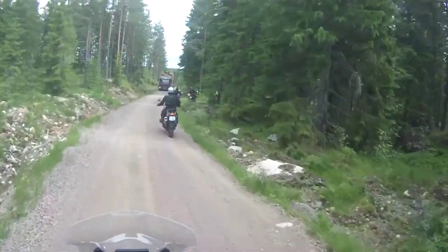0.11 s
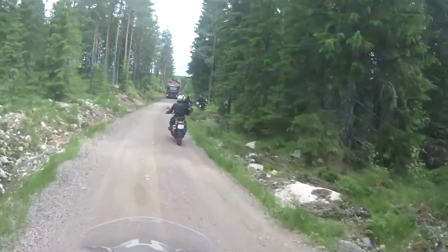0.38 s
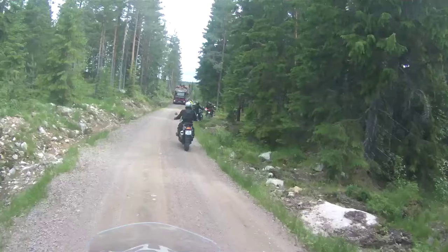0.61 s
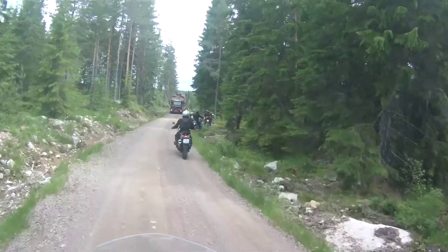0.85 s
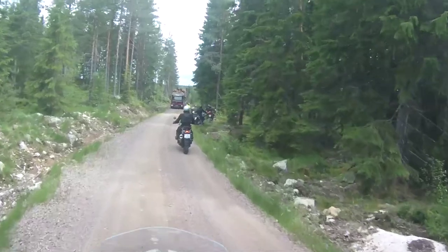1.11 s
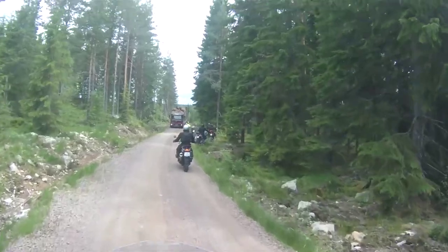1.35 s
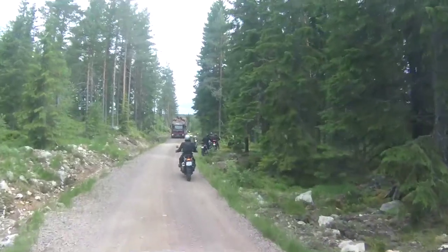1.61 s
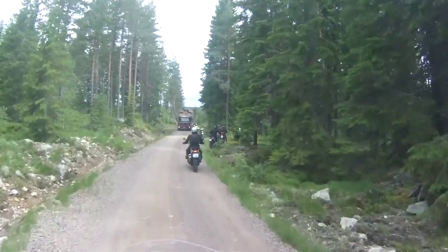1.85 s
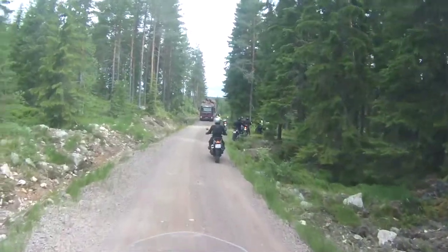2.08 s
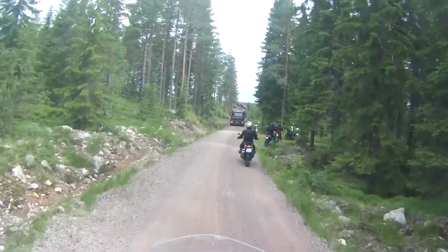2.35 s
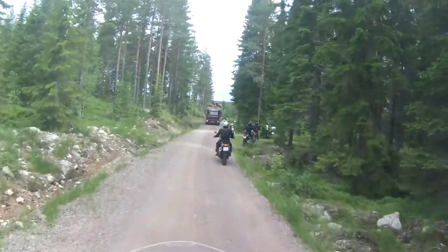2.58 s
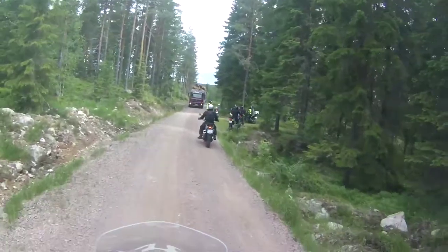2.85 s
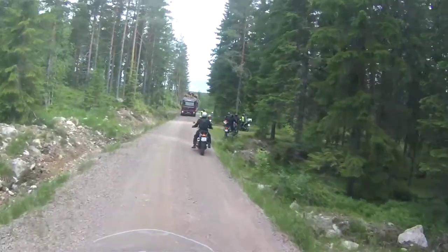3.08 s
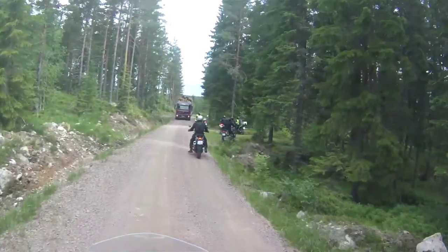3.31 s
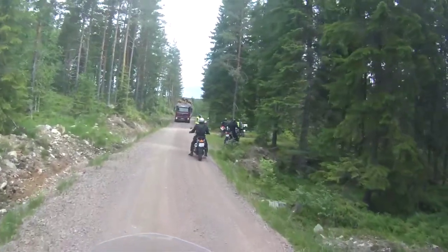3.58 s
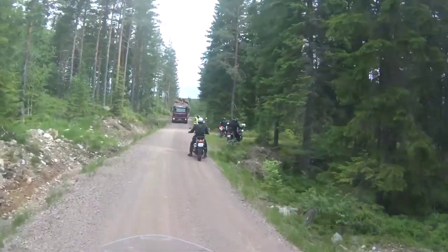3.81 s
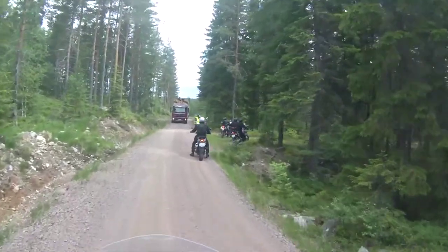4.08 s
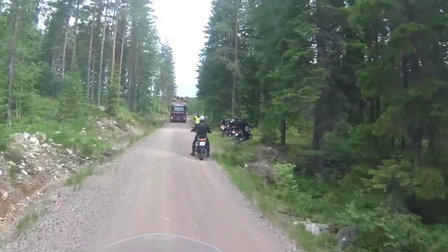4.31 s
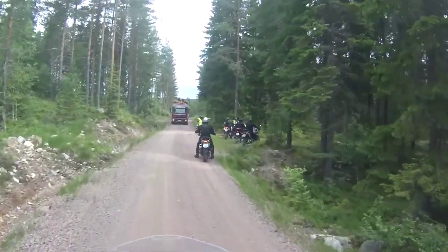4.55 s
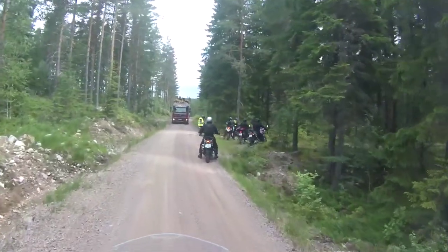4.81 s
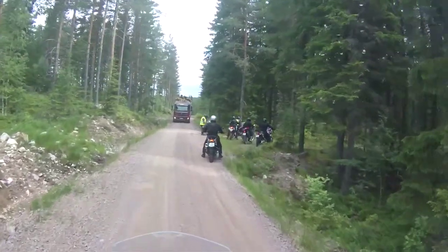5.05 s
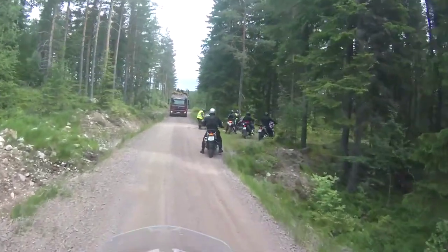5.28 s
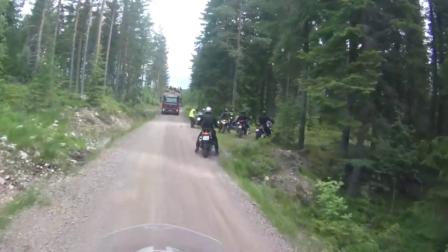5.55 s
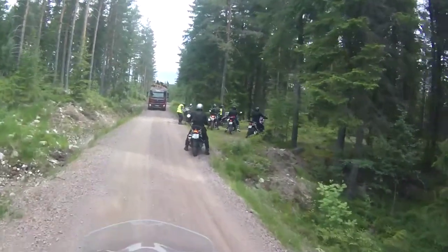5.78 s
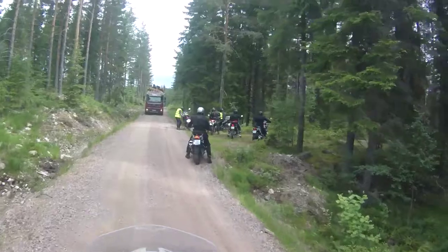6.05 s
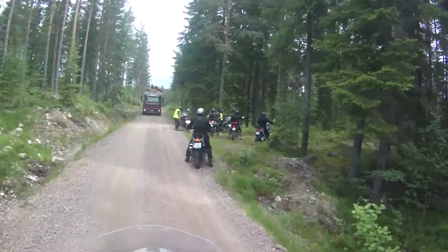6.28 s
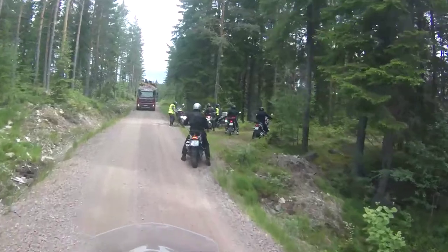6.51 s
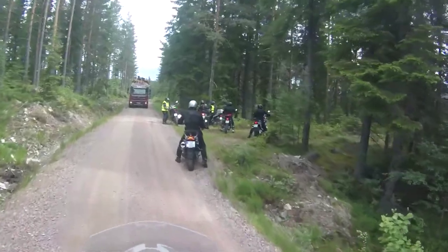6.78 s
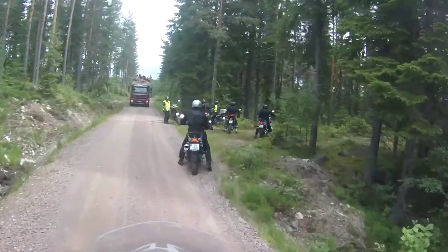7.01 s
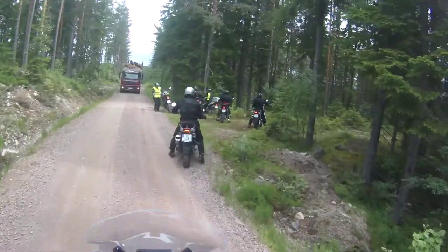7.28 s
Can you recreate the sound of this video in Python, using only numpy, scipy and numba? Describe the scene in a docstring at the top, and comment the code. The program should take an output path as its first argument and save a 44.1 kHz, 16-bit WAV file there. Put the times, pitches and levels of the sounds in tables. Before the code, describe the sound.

A motorcycle idles slowly over crunching gravel, muffled wind buffeting and dull knocks around it, then the engine revs into a rising hum at the end.

```python
"""A twin-cylinder motorcycle coasts at idle along a forest gravel road, heard by a helmet camera in a closed case.
From the start low-passed pulse trains thump in the exhaust, noise bursts excite casing modes and valve ticks,
and dense clicks crunch under the tyres; decaying partials knock the frame and band-passed noise buffets the port.
From about 2 s brakes squeak faintly as short, randomly modulated sines.
At the end the rider opens the throttle and the thuds fuse into rising harmonics of the firing rate."""
import sys
import numpy as np
from scipy import signal
from scipy.fft import rfft, irfft, next_fast_len
from scipy.io import wavfile
from scipy.ndimage import uniform_filter1d
from numba import njit

SR = 44100
rng = np.random.default_rng(int(sys.argv[2]) if len(sys.argv) > 2 else 0)


def natural_amplitude(level_db):
    """Convert a level in decibels to a linear amplitude factor, elementwise."""
    exponent = np.asarray(level_db, float) / 20
    return 10 ** exponent


def dump(signal):
    """Clip the signal to [-1, 1] and save it as 16-bit WAV at the path in sys.argv[1]."""
    limited = np.clip(np.atleast_2d(signal).T, -1, 1)
    pcm = np.round(limited * 32767).astype(np.int16)
    wavfile.write(sys.argv[1], SR, pcm)


N = 325899
T = np.arange(N) / SR

# firing rate of the revved engine: t/s, f/Hz
REV = [(6.42, 20.76), (6.548, 25.45), (6.694, 32.6), (6.802, 41.43), (6.922, 48.83), (7.006, 53.8),
       (7.12, 58.3), (7.21, 61.2), (7.3, 63.6), (7.39, 65.2)]


def level(x, db):
    """Normalisation: scale to an rms level in dB."""
    return x * natural_amplitude(db) / np.sqrt(np.mean(x ** 2))


def curves(table):
    """Linear interpolation: the columns of a table, sample by sample."""
    s, *columns = np.transpose(table)
    return [np.interp(T, s, c) for c in columns]


def colour(x, points):
    """Linear filtering: multiply the spectrum by a gain curve drawn over log frequency."""
    hz, db = np.transpose(points)
    size = next_fast_len(N)
    f = np.arange(size // 2 + 1) * SR / size + 1
    gain = natural_amplitude(np.interp(np.log(f), np.log(hz), db, -120, -120))
    return irfft(rfft(x, size) * gain, size)[:N]


@njit
def svf(x, hz, width):
    """Second-order resonance: a state-variable band-pass with a moving centre, gain 1 there."""
    y, b, l = np.empty(len(x)), 0., 0.
    for i in range(len(x)):
        g, k = np.tan(np.pi * hz[i] / SR), width[i] / hz[i]
        v = (b + g * (x[i] - l)) / (1 + g * (g + k))
        b, l, y[i] = 2 * v - b, l + 2 * g * v, k * v
    return y


def ring(x, modes):
    """Modal superposition: resonances (f/Hz, width/Hz, level/dB) in parallel, neighbours in opposite sign."""
    out = np.zeros(N)
    for k, (hz, width, db) in enumerate(modes):
        out += (-1) ** k * natural_amplitude(db) * svf(x, np.full(N, 1. * hz), np.full(N, 1. * width))
    return out


def walk(rate):
    """Slow random modulation: values held 1 / rate s and smoothed twice; spread near 1."""
    k = int(SR / rate)
    held = np.repeat(rng.standard_normal(N // k + 1), k)
    return 1.07 * uniform_filter1d(uniform_filter1d(held, k), k)[:N]


def beats(cycle, pattern, jitter_s, scatter_db):
    """Periodic excitation: an impulse at each place of every cycle, a little uneven in time and size."""
    place, db = np.transpose(pattern)
    turns = np.arange(int(cycle[0]), int(cycle[-1]) + 1)[:, None] + place
    chance = rng.standard_normal(turns.shape + (2,))
    at = (np.interp(turns, cycle, T, -1, -1) + jitter_s * chance[..., 0]) * SR
    inside = (at > 0) & (at < N - 1)
    out = np.zeros(N)
    np.add.at(out, at[inside].astype(int), natural_amplitude(db + scatter_db * chance[..., 1])[inside])
    return out


def bursts(impulses, decay_s, rest):
    """Exponential decay: noise that jumps at each impulse and fades to a steady rest."""
    fade = signal.lfilter([1], [1, -np.exp(-1 / (decay_s * SR))], impulses)
    return (fade + rest) * rng.standard_normal(N)


def grit(per_s, spread_db):
    """Random impact process: dense clicks, a few of them much larger."""
    happens = rng.random(N) < per_s / SR
    size_db = spread_db * -np.log(rng.random(N) + .003)  # the offset bounds the largest clicks
    return happens * natural_amplitude(size_db) * rng.standard_normal(N)


def muffle(x):
    """Low-pass transmission: the closed case lets little through above its edge at 2542 Hz."""
    return signal.sosfilt(signal.cheby1(6, 1, 2542, fs=SR, output="sos"), x)


def crank():
    """Phase as the integral of rate: four-stroke cycles turned so far, idling and then revving."""
    # firing rate at idle: t/s, f/Hz
    idle = [(0, 20.39), (1, 20.27), (1.8, 20.14), (2.6, 20.4), (3.4, 20.44), (3.8, 20.6), (4.6, 20.47),
            (5.4, 20.37), (6.2, 20.5), (6.4, 20.5)]
    firing_hz, = curves(idle + REV)
    return .135 + np.cumsum(firing_hz) / SR / 2  # two main firings a cycle


def exhaust(cycle, shake_db):
    """Pulse radiation: each gas pulse arrives as a short dip in pressure, filtered by the pipe."""
    # exhaust pulses of one cycle: place/cycle, level/dB
    firings = [(.497, 0), (.997, 0), (.26, -11), (.75, -11)]
    # spectrum of one thud: f/Hz, level/dB
    pipe = [(25, -16), (41, -3.5), (61, -11), (100, 5.5), (145, -5), (215, 2.5), (300, -7.5), (500, -24),
            (900, -59)]
    # single harder firings: t/s, extra level/dB
    hard = [(.8, 8), (3.58, 3.5), (4.99, 2), (6.01, 7)]
    follows = .6  # dB per dB of shaking
    thuds = level(colour(-beats(cycle, firings, 0.00059, 1.5), pipe), 0)
    # single thuds fade as the firings crowd together
    thuds = thuds * natural_amplitude(-8 * np.clip((T - REV[0][0] - .2) / .3, 0, 1))
    extra_db = sum(db * np.exp(-((T - s) / 0.016) ** 2) for s, db in hard)
    return thuds * natural_amplitude(-42 + follows * shake_db + extra_db)


def casing_clacks(cycle):
    """Modal excitation: noise bursts locked to the cycle set the casing ringing."""
    # clacks of one cycle: place/cycle, level/dB
    clack_places = [(.3, -5), (.43, -6), (.75, 0), (.91, -4)]
    # casing modes: f/Hz, width/Hz, level/dB
    casing = [(1112, 75, 0), (1600, 500, -10), (2350, 400, -15)]
    strikes = uniform_filter1d(beats(cycle, clack_places, 0.0018, 3.), size=180)
    return level(ring(bursts(strikes, 0.0051, .3), casing), -1.73)


def tyres():
    """Granular impact noise: dense gravel clicks, filtered and slowly modulated."""
    # tyre spectrum: f/Hz, gain/dB
    road = [(20, -15), (45, 0), (90, 5.5), (150, 3), (230, 2.5), (350, -11.5), (480, -6), (600, -16.5),
            (760, -15), (950, -4.5), (1110, 1.5), (1550, -15.5), (2390, -19.5), (3200, -16)]
    crunch = grit(5000, 1.6) * natural_amplitude(0.65 * walk(12))
    return level(colour(crunch, road), 2.8)


def valve_gear(cycle, clatter_db, shake_db):
    """Impulsive noise: bursts locked to the cycle, heard as ringing ticks and a finer hiss."""
    # valve ticks of one cycle: place/cycle, level/dB
    tick_places = [(.12, -9.5), (.3, -21), (.43, -1), (.57, -5), (.92, -1)]
    # spectrum of the ticks: f/Hz, gain/dB
    treble = [(1650, -38), (2800, 5), (2970, 1), (3580, -3.5), (4430, 0), (4620, -6), (4870, -10),
              (5720, -14.5), (6810, -7), (10000, -18.5), (13000, -35), (22000, -120)]
    # spectrum of the hiss: f/Hz, gain/dB
    hiss_band = [(8500, -25), (10000, -16.5), (12200, -7.5), (13300, -12.5), (15000, -18)]
    hiss_follows = 1.1  # dB per dB of shaking
    # the open throttle lifts the treble from 6.5 s on
    intake = np.clip((T - 6.5) / 0.39, 0, 1)
    tick_db = clatter_db - 24.5 + 2 * intake
    hiss_db = -84.5 + hiss_follows * shake_db + 7 * intake
    strikes = uniform_filter1d(beats(cycle, tick_places, .003, 3), size=400)
    ticking = bursts(strikes, .003, .6) * natural_amplitude(.8 * walk(16))
    ringing = ring(ticking, [(4470, 120, 7.0), (6670, 170, -25)])
    ticks = level(colour(ticking, treble) + natural_amplitude(-11.5) * ringing, 1.0)
    # random signs make a noise with the same envelope but independent of the ticks
    scrambled = ticking * rng.choice([-1, 1], N)
    hiss = level(colour(scrambled * natural_amplitude(2.0 * walk(23)), hiss_band), 0.93)
    return ticks * natural_amplitude(tick_db) + hiss * natural_amplitude(hiss_db)


def motorcycle(cycle):
    """Common modulation: shaking on the rough road lifts exhaust, clatter, ticks and tyres together."""
    # shaking of the machine: t/s, reference level of clacks and tyres/dB
    load = [(0.0, -45), (0.16, -45), (0.33, -49), (0.8, -44.5), (0.88, -47.5), (1.38, -44.5), (1.78, -47),
            (2.38, -44), (3.2, -48), (3.55, -43.5), (3.66, -45.5), (4.9, -43.5), (5.27, -45.5), (5.45, -42),
            (5.7, -43.5), (5.98, -41.5), (6.2, -47), (6.55, -44), (6.91, -49.5), (7.0, -47), (7.39, -48.5)]
    clatter_db, = curves(load)
    shake_db = clatter_db + 45
    rolling = (casing_clacks(cycle) + tyres()) * natural_amplitude(clatter_db)
    return muffle(exhaust(cycle, shake_db) + rolling) + valve_gear(cycle, clatter_db, shake_db)


def revving(cycle):
    """Harmonic synthesis: multiples of the firing rate, loud where they cross the pipe boom."""
    # level of the hum ahead of orders and boom: t/s, level/dB
    hum = [(6.42, -58), (6.55, -43), (6.7, -44), (6.8, -46.5), (6.92, -49), (7.0, -43.5), (7.15, -45),
           (7.27, -41.5), (7.39, -40)]
    # multiples of the firing rate that sound: multiple, level/dB
    orders = [(2, 1.7), (3, 2.8), (4, -4.5), (5, -10), (7, -4)]
    # pipe boom: f/Hz, gain/dB
    boom = [(40, -20), (95, -17), (107, -1), (140, 0), (176, -1), (188, -16), (300, -10), (380, -11),
            (450, -5)]
    throttle = np.clip((T - REV[0][0]) / 0.31, 0, 1)
    rate, hum_db = curves(REV) + curves(hum)
    boom_hz, boom_db = np.transpose(boom)
    lines = np.zeros(N)
    for multiple, own_db in orders:
        pipe_db = np.interp(np.log(multiple * rate), np.log(boom_hz), boom_db)
        line_db = hum_db + own_db + pipe_db + 1.8 * walk(30)
        lines += natural_amplitude(line_db) * np.cos(2 * np.pi * multiple * 2 * cycle)
    return -np.sqrt(2) * throttle * lines


def knocks():
    """Damped oscillation: short dull rings of frame and case, each with a brighter overtone."""
    # knocks: t/s, level of the fundamental before its decay and the case/dB, f/Hz
    stones = [(0.114, -20, 443), (0.485, -23, 350), (0.505, -17.5, 494), (0.722, -20, 363),
              (0.98, -14.5, 564), (1.112, -25, 240), (1.553, -21, 293), (1.691, -21, 434),
              (1.868, -24, 450), (2.773, -18.5, 404), (2.793, -26, 258), (4.969, -32, 214),
              (6.454, -25.5, 196), (6.496, -39, 1140), (6.538, -30, 202), (6.706, -25, 145)]
    rise_s = .0025
    out, t = np.zeros(N + 2000), np.arange(2000) / SR
    for s, db, hz in stones:
        i = int(s * SR)
        tone = np.sin(2 * np.pi * hz * t) + 0.53 * np.sin(2 * np.pi * 2.326 * hz * t)
        envelope = np.minimum(t / rise_s, 1) * np.exp(-t * hz / 1.52)  # higher knocks die sooner
        out[i:i + len(t)] += natural_amplitude(db) * envelope * tone
    return muffle(out[:N])


def squeaks():
    """Stick-slip friction: brief thin brake squeals with a rough random amplitude."""
    # squeals: t/s, length/s, f/Hz, level ahead of the roughness/dB
    squeals = [(2.28, .07, 12250, -74), (6.03, 0.034, 15100, -73), (6.16, 0.03, 14700, -79),
               (6.305, .05, 14200, -89)]
    rough = walk(300)
    out = np.zeros(N)
    for s, long, hz, db in squeals:
        swell = np.sin(np.pi * np.clip((T - s) / long, 0, 1))
        out += natural_amplitude(db) * swell * np.sin(2 * np.pi * hz * T)
    return rough * out


def gusts():
    """Envelope maximum: each gust rises, holds and falls in dB; the strongest one rules the air."""
    # gusts on the port: t/s, length/s, level ahead of the buffeting law/dB, centre f/Hz, skirt level/dB
    blows = [(.03, 0.032, -36.5, 273, -8.5), (0.135, 0.16, -36, 290, -14), (0.378, 0.22, -38, 356, -6),
             (0.588, 0.065, -37.5, 388, -4), (0.726, 0.11, -36, 320, -19), (0.81, 0.14, -36.5, 403, -13.5),
             (0.969, .14, -35.5, 368, -5), (1.243, 0.015, -40, 280, -9), (1.343, 0.37, -39, 356, -10),
             (1.601, 0.077, -35, 323, -11), (1.73, 0.053, -40.5, 295, -20), (1.833, 0.049, -42, 286, -6),
             (1.923, 0.082, -42, 307, -9), (2.07, 0.056, -45, 282, -7), (2.52, 0.09, -42.5, 236, -11),
             (2.588, 0.086, -42.5, 280, -16), (2.776, .02, -42.5, 300, -9), (2.95, 0.11, -43.5, 280, -9),
             (3.268, .15, -44.5, 262, -12), (4.468, 0.053, -43, 274, -5), (4.967, 0.02, -43, 255, -0.5),
             (5.175, 0.095, -37, 380, -19), (5.29, .16, -37, 350, -22), (5.554, 0.077, -37.5, 280, -22),
             (5.773, .04, -38.5, 255, -11), (5.937, 0.16, -39, 272, -11.5), (6.346, 0.037, -40, 250, -13.5),
             (6.46, 0.085, -44, 285, -2.5), (6.946, 0.14, -45, 260, -6), (7.123, 0.43, -44, 270, -1.5)]
    rise_db_s, fall_db_s = 244, 174
    # calm air between the gusts
    db, hz, skirt_db = -46.5 + 0.8 * walk(14), np.full(N, 255.), np.full(N, -6.5)
    for s, long, top_db, centre_hz, bright_db in blows:
        rise = rise_db_s * np.maximum(s - T, 0)
        fall = fall_db_s * np.maximum(T - s - long, 0)
        now = top_db - rise - fall
        rules = now > db
        db = np.where(rules, now, db)
        hz = np.where(rules, centre_hz, hz)
        skirt_db = np.where(rules, bright_db, skirt_db)
    skirt_db = uniform_filter1d(skirt_db, size=900) + 3 * walk(25)
    hz = uniform_filter1d(hz, size=900) * natural_amplitude(1.04 * walk(29))
    return db, skirt_db, hz


def wind():
    """Turbulent pressure: eddies slap the port as lumpy noise round a wandering centre, with a brighter skirt."""
    db, skirt_db, hz = gusts()
    eddies = grit(5000, 1.5) * natural_amplitude(2.5 * walk(80) + .8 * walk(30))
    body = svf(svf(eddies, hz, 1.23 * hz), hz, 1.23 * hz)
    body = level(body, 0.17)
    scrambled = eddies * rng.choice([-1, 1], N)
    skirt = ring(ring(scrambled, [(687, 510, 0)]), [(746, 1340, 0)])
    skirt = level(skirt, 0.11)
    # buffeting sets in steeply: weak air hardly stirs the port
    port_db = db + 0.86 * np.minimum(db + 46, 0)
    return muffle(body + skirt * natural_amplitude(skirt_db)) * natural_amplitude(port_db)


def apart(mid, air):
    """Decorrelation: a faint patchy hiss, a slight waver and a little wind in opposite sign on the two sides."""
    # spectrum of the hiss: f/Hz, gain/dB
    apart_band = [(1180, -34), (2000, 0), (2270, -4), (2410, -37), (2550, 0), (3220, 2), (8790, -5.5),
                  (13000, -14)]
    patchy = natural_amplitude(3 * walk(12))
    hiss = level(colour(rng.standard_normal(N) * patchy, apart_band), -82.5)
    waver = natural_amplitude(-43.5) * walk(130) * mid
    return hiss + waver + natural_amplitude(-31.5) * walk(110) * air


def scene():
    """Mid-side superposition: one port hears nearly everything and the sides differ faintly."""
    cycle = crank()
    air = wind()
    mid = motorcycle(cycle) + revving(cycle) + air + knocks() + squeaks()
    side = apart(mid, air)
    return np.array([mid + side, mid - side])


def band_limit(x):
    """A steep low-pass at the top of the band."""
    return signal.sosfilt(signal.butter(12, 15150, fs=SR, output="sos"), x)


def record(dry):
    """High-pass filtering and saturation: the camera cuts the deepest bass and rounds the highest peaks."""
    cut = signal.sosfilt(signal.butter(2, 30., "high", fs=SR, output="sos"), dry)
    rounded = .12 * np.tanh(cut / .12)
    return band_limit(rounded)


dry = scene()
out = record(dry)
dump(out)
```